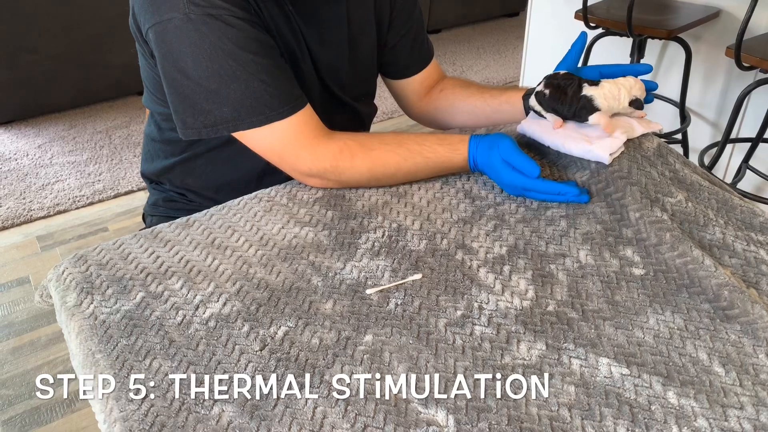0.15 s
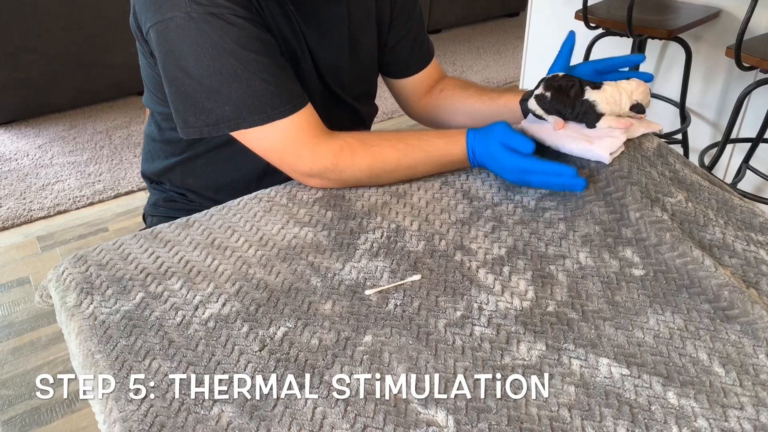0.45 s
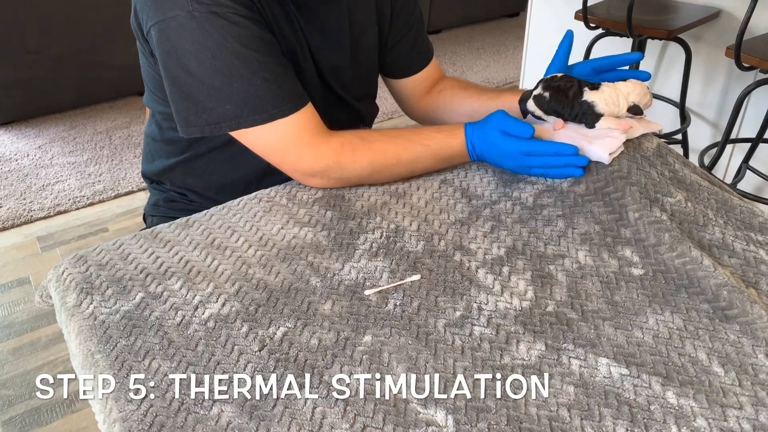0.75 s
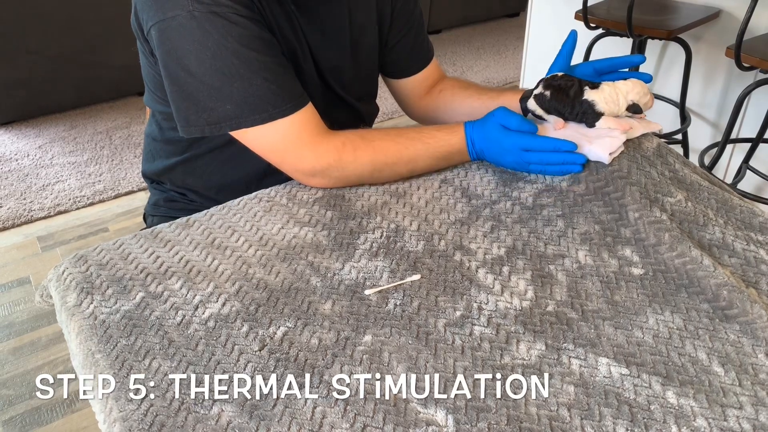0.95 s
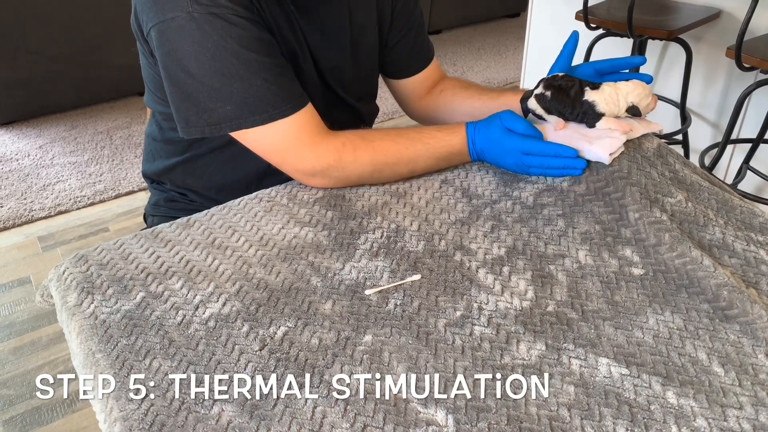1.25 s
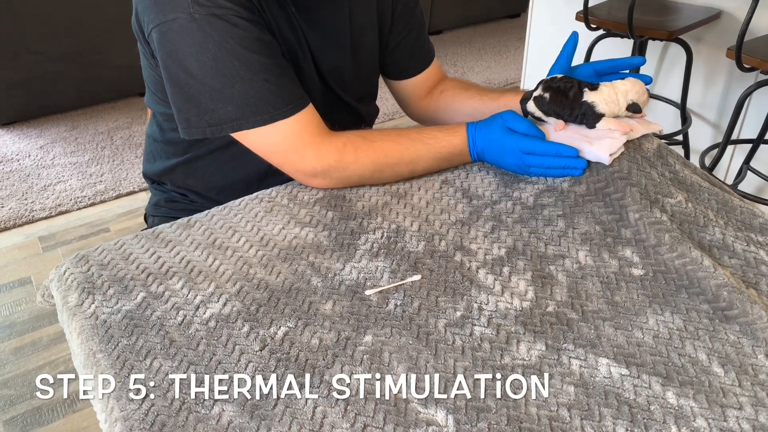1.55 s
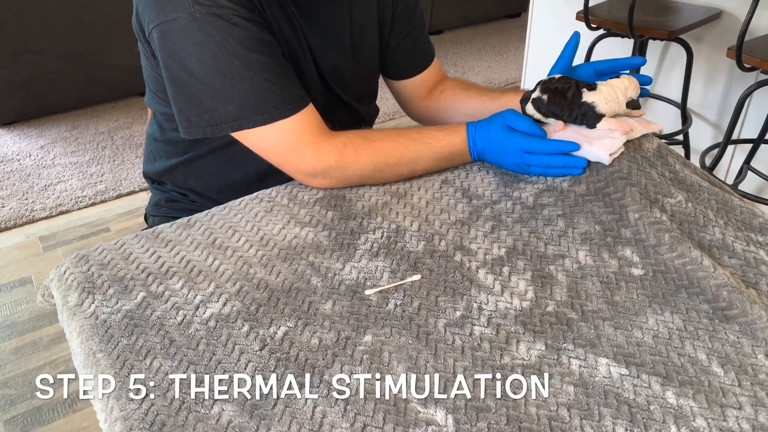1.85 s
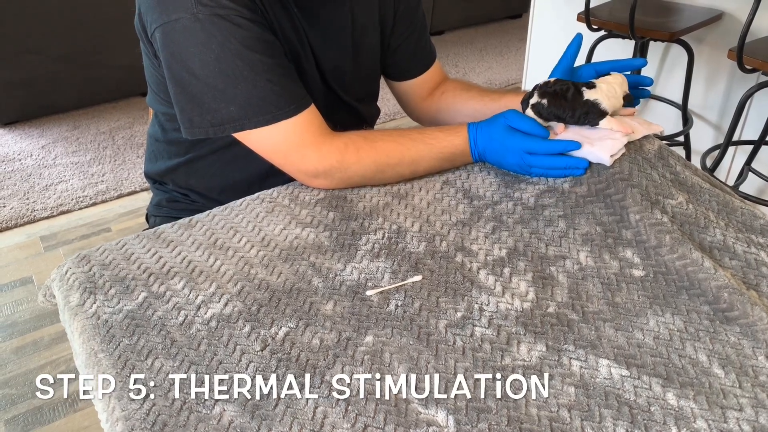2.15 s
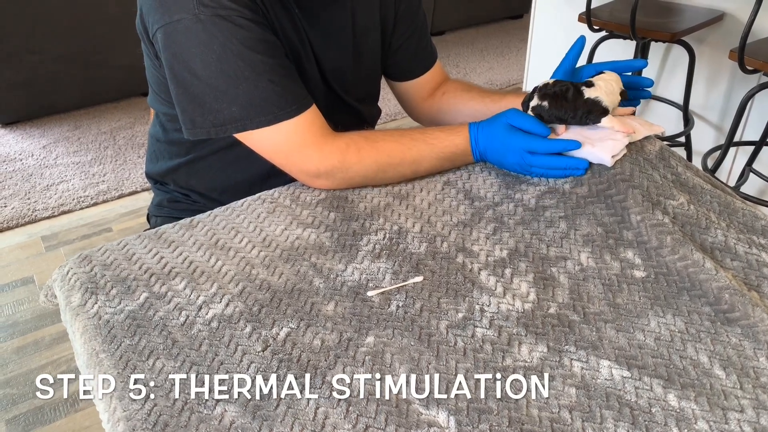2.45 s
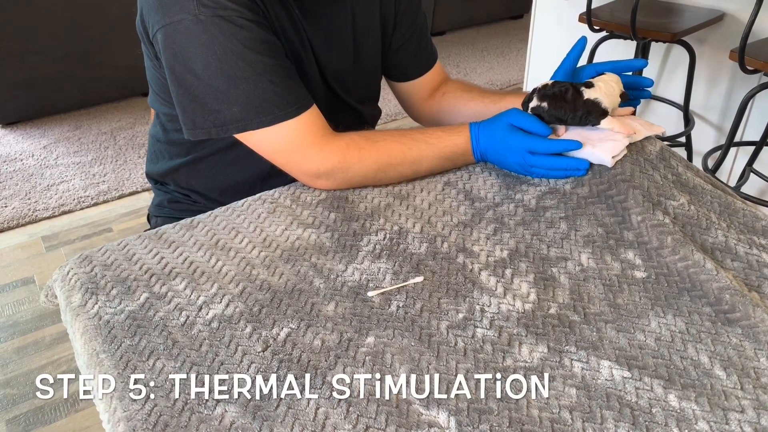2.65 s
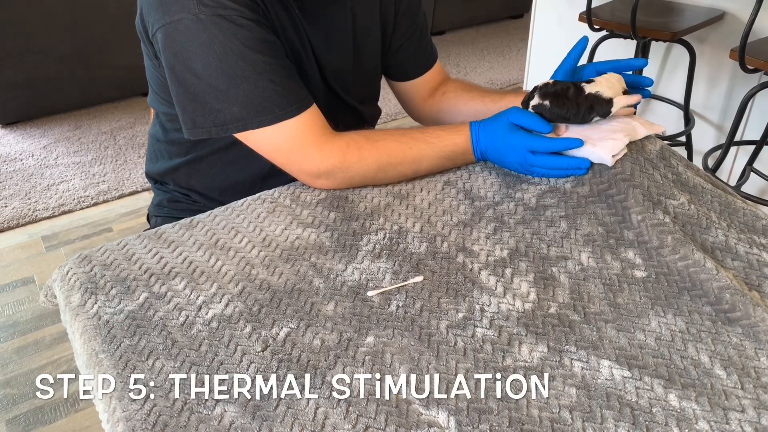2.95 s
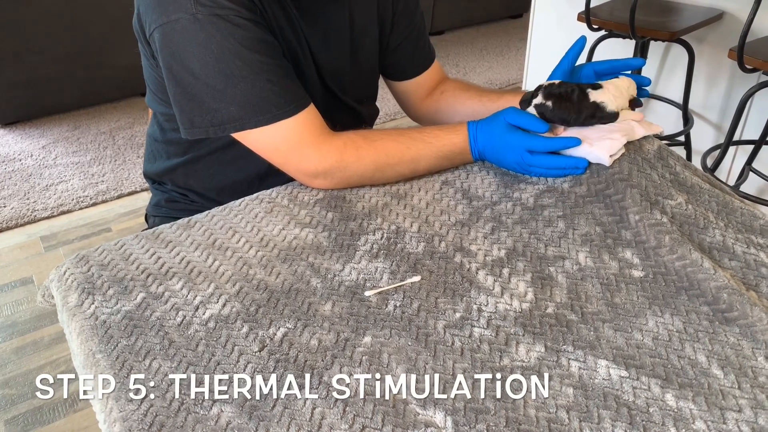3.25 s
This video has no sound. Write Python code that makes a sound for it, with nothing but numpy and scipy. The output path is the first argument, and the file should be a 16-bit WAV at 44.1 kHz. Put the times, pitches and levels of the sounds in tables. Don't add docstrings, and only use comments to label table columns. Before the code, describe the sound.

A newborn puppy squeals eight times in quick, arching cries, some soft, some raspy and piercing, a couple of metres from the microphone in a lively hard-floored room with a low appliance hum.

```python
import sys
import numpy as np
from scipy import signal
from scipy.fft import rfft, irfft
from scipy.io import wavfile
from scipy.ndimage import uniform_filter1d

SR = 44100
rng = np.random.default_rng(int(sys.argv[2]) if len(sys.argv) > 2 else 0)


def dump(signal):
    limited = np.clip(np.atleast_2d(signal).T, -1, 1)
    pcm = np.round(limited * 32767).astype(np.int16)
    wavfile.write(sys.argv[1], SR, pcm)


def makeup_ratio(level_db):
    decades = np.asarray(level_db, float) / 20
    return 10 ** decades


N = 149940
T = np.arange(N) / SR

# t/s, pitch f/Hz, level/dB, mouth opening/dB
SOFT_SQUEALS = [
    [(0.08, 337.3, -68, -22), (0.122, 527, -49.5, -46), (0.168, 537.5, -44, -66), (0.19, 498.7, -49.5, -59),
     (0.214, 406.2, -47.5, -42), (0.242, 356.7, -51.5, -35), (0.27, 345.5, -49, -51)],
    [(0.85, 343, -55, -29.5), (0.88, 346.3, -58.5, -38), (0.918, 461, -48.5, -59), (0.94, 458.7, -45, -56),
     (0.962, 452.6, -48.5, -38), (0.998, 350.4, -48, -30), (1.04, 353, -65, -32)],
    [(1.705, 406, -71, -18), (1.727, 428.4, -54, -43), (1.783, 631, -41.5, -55), (1.797, 642, -43.5, -39),
     (1.833, 554, -44.5, -38), (1.875, 409, -47, -48), (1.9, 410.0, -49, -37)],
    [(2.515, 351, -62, -14), (2.527, 361, -55.5, -27), (2.581, 669, -40, -53), (2.623, 692.2, -41, -22),
     (2.699, 496.2, -46.5, -18), (2.743, 342.8, -52.5, -24), (2.77, 322.5, -51, -20)],
]
PUSHED_SQUEALS = [
    [(0.45, 419.3, -69, -31), (0.462, 509.5, -56, -43), (0.48, 652.4, -48, -51), (0.49, 708.4, -39.5, -45),
     (0.496, 722, -38, -45), (0.516, 749.3, -41, -34), (0.528, 801.4, -40, -37), (0.546, 620, -44.5, -42),
     (0.58, 520, -53, -33)],
    [(1.208, 475.8, -86, -17), (1.22, 531.5, -56, -46), (1.242, 754.8, -43, -52), (1.256, 790.6, -40, -37),
     (1.276, 709.5, -39, -34.5), (1.306, 722, -40, -37), (1.32, 810.7, -43.5, -33),
     (1.345, 689.7, -44.5, -29.5), (1.41, 522, -52.5, -21)],
    [(2.09, 491.5, -59, -33), (2.116, 620.8, -45.5, -57), (2.144, 771.5, -39, -50), (2.15, 799, -36.5, -40),
     (2.166, 912.3, -34, -27), (2.19, 798, -32, -31), (2.204, 767.6, -39, -21.5), (2.236, 639.4, -48, -18),
     (2.27, 563, -52.5, -19)],
    [(2.952, 468.5, -51, -35), (2.968, 550, -50, -69), (2.988, 736, -39.5, -31.5),
     (3.02, 821.3, -36, -10.5), (3.042, 804, -33.5, -20), (3.098, 629, -43, -16.5),
     (3.158, 678.2, -41, -21), (3.198, 519, -46, -27), (3.22, 456, -41, -36)],]
# roughness/0-1, tilt/dB per octave, ring level/dB, ring
# growth/dB per s, top air level/dB
VOICE_QUALITY = [(.08, -6.5, -11, 14, -55), (.08, -6, -19, 21, -55), (0.11, -3, -12, 2, -50),
                 (0.08, -2.5, -4.5, 34, -24), (.22, -3, -5.5, 15, -16), (.45, -1, -5, 22, -22.5),
                 (0.44, 0.5, -4.5, 8, -23), (.12, -1, -5.5, 37, -21.5)]
# peak f/Hz, peak level/dB, dip f/Hz, dip level/dB, cheek level/dB
MOUTH_POSTURE = [(1640, -0.5, 3200, -6.5, 0), (2400, 6, 1700, -4.5, -5), (1950, 2, 1370, -3, 7),
                 (1298, 3, 2340, -7.5, 1), (1620, -3, 3200, -3.5, -0.5), (1360, 1, 2110, -2.5, 8),
                 (1103, 2, 2300, -2.5, 9), (1910, 3, 1200, -2.5, -1)]
# start t/s, length t/s, share/0-1, fundamental level/dB, its fading/dB per s
REGISTER_BREAK = [(.2, 0.062, 0, -0.5, -2.5), (0.964, 0.057, 0.06, -0.5, 0), (1.834, 0.091, 0.01, -1, 15),
                  (2.523, 0.045, .1, 1, -11), (0.487, 0.039, 0.97, 6.5, -15),
                  (1.249, 0.067, 0.62, 5.5, -19), (2.136, 0.03, .9, 5.5, -34), (2.999, 0.038, 0.1, 4, -65)]
GUM_HISS = [7500, 7700, 7800, 7040, 5400, 7630, 7100, 6830]
# start t/s, length t/s, f/Hz, level/dB
SIDE_TONES = [(2.995, 0.036, 1150, -32), (2.965, 0.026, 1150, -41), (1.25, 0.092, 950, -44.5),
              (.487, 0.027, 1050, -41.5), (.52, 0.021, 1600, -40.5), (3.035, 0.047, 1400, -34),
              (2.672, 0.034, 1540, -41), (2.135, 0.034, 1150, -34), (.485, 0.046, 2180, -43),
              (.51, 0.032, 910, -43), (1.25, 0.031, 1300, -38), (1.272, .03, 1480, -36),
              (1.29, 0.028, 1300, -34), (1.31, 0.025, 1400, -41.5), (1.245, .035, 2400, -46),
              (.145, 0.042, 1620, -48), (2.995, 0.077, 2250, -41), (3.1, .08, 2650, -43.5),
              (.495, 0.023, 3150, -54.5)]
# f/Hz, level/dB
THROAT = [(120, -78), (300, -8), (600, -6), (1100, 3.5), (1600, 3), (2200, -2), (3000, -21), (4300, -56)]
# f/Hz, level/dB
FRONT_RING = [(1700, -37), (2000, 1.5), (2700, 5), (3300, 3), (3650, -10), (4200, -15), (5200, -25),
              (5800, -49)]
# f/Hz, level/dB
OPEN_MOUTH = [(2700, -29), (3500, 0.5), (4400, -2), (5200, -2), (6000, 1), (7000, -6), (8000, -8.5),
              (8500, -45)]
# f/Hz, level/dB
TOP_AIR = [(9600, -44), (10200, 2), (11500, 9.5), (13300, 7), (15000, 12), (16000, -2.5)]
# f/Hz, level/dB per Hz
AIR_NOISE = [(15, -57), (25, -26), (170, -17), (307, -7), (526, -13), (1280, -24), (2380, -34),
             (12000, -45.5), (15700, -55)]
# f/Hz, width/Hz, level/dB
APPLIANCE_HUM = [(260.5, 34.6, -71), (320.4, 43, -64.5), (410, 76, -76.5), (119.3, 6.8, -92.5)]
# f/Hz, T60/s
REVERB_TIME = [(400, 0.5), (1500, 0.43), (4000, 0.39), (8000, 0.37), (14000, 0.29)]
# f/Hz, level/dB
MICROPHONE = [(20, -21), (45, -1.5), (70, 0)]

AIR_DB, DIRECT_DB, ROOM_DB = -66.5, -1.5, -3.5
ROOM_BUILD_S = 0.0028
WRIGGLE_S, ECHO_WANDER_S = 0.0004, 0.0002
JITTER, SHIMMER_DB = 0.1245, 6.5
ONSET_ROUGH, ONSET_S = 0.348, 0.0303
PATCHY_DB = 2.5
ATTACK_S, RELEASE_S = 0.018, 0.017
BREAK_RATIO = 3 / 2
BREATH_DB, BREATH_DB_PER_ROUGH, RING_BREATH_DB = -14, 19, -13
RING_LATE_DB, RING_OPENS_S = -12, 0.024
RING_FOLLOWS_MOUTH, TOP_FOLLOWS_MOUTH = 0.3, 0.5
HISS_DB, HISS_OCTAVES = 4.5, 0.064
SHAPE_OCTAVES, CHEEK_HZ = 0.16, 3790
NASAL_HZ, NASAL_DB, NASAL_OCTAVES = 5020, -4, 0.068


def unit(x):
    return x / np.sqrt(np.mean(x ** 2) + 1e-30)


def bin_hz(size):
    return np.maximum(np.arange(size // 2 + 1) * SR / size, 1)


def colour(x, table):
    hz, db = np.array(table, float).T
    gain = makeup_ratio(np.interp(np.log(bin_hz(len(x))), np.log(hz), db))
    return irfft(rfft(x) * gain, len(x))


def walk(rate, size):
    k = max(int(SR / rate), 1)
    once = uniform_filter1d(rng.standard_normal(size), k)
    return unit(uniform_filter1d(once, k))


def background():
    out = makeup_ratio(AIR_DB) * unit(colour(rng.standard_normal(N), AIR_NOISE))
    for hz, width, db in APPLIANCE_HUM:
        sos = signal.butter(2, [hz - width / 2, hz + width / 2], "band", fs=SR, output="sos")
        hum = unit(signal.sosfilt(sos, rng.standard_normal(N)))
        out = out + makeup_ratio(db + 1.5 * walk(6, N)) * hum
    return out


def room(x):
    t = T[:SR]
    hz, t60 = np.array(REVERB_TIME).T
    tail = 0
    for f in 180 * 2 ** np.arange(0, 6.6, 0.5):
        half_octave = [(f / 1.45, -60), (f / 1.15, 0), (f * 1.15, 0), (f * 1.45, -60)]
        band = colour(rng.standard_normal(SR), half_octave)
        tail = tail + band * makeup_ratio(-60 * t / np.interp(np.log(f), np.log(hz), t60))
    tail = tail * (1 - np.exp(-t / ROOM_BUILD_S))
    spectrum = rfft(tail)
    power = np.abs(spectrum) ** 2 + 1e-12
    evening = np.sqrt(uniform_filter1d(power, size=801) / uniform_filter1d(power, size=41))
    tail = irfft(spectrum * evening, SR)
    tail_energy = np.sum(colour(tail, THROAT) ** 2)
    noise_power = np.mean(colour(rng.standard_normal(SR), THROAT) ** 2)
    tail = tail / np.sqrt(tail_energy / noise_power)
    moved = np.interp(T + WRIGGLE_S * walk(24.9, N), T, x)
    echoes = signal.fftconvolve(moved, tail)[:N]
    return np.interp(T + ECHO_WANDER_S * walk(20, N), T, echoes)


def side_tone(start, length, hz, db):
    phase = 2 * np.pi * np.cumsum(hz * (1 + 0.0142 * walk(45.15, N))) / SR
    env = np.sin(np.pi * np.clip((T - start) / length, 0, 1)) ** 2
    return makeup_ratio(db) * env * np.sin(phase)


def mouth_shape(x, peak_hz, peak_db, dip_hz, dip_db, cheek_db):
    octave = np.log2(bin_hz(len(x)))
    bumps = [(peak_hz, peak_db, SHAPE_OCTAVES), (dip_hz, dip_db, SHAPE_OCTAVES),
             (CHEEK_HZ, cheek_db, SHAPE_OCTAVES / 2), (NASAL_HZ, NASAL_DB, NASAL_OCTAVES)]
    gain_db = 0
    for hz, db, wide in bumps:
        gain_db = gain_db + db * np.exp(-0.5 * ((octave - np.log2(hz)) / wide) ** 2)
    return irfft(rfft(x) * makeup_ratio(gain_db), len(x))


def fold_cycles(t, age, glide, phase, start, length, share, first_db, fade_db):
    size = len(t)
    folds = 0
    for k in range(1, 31):
        partial_db = PATCHY_DB * walk(50, size)
        if k == 1:
            partial_db = partial_db + first_db + fade_db * age
        audible = k * glide < 0.45 * SR
        folds = folds + makeup_ratio(partial_db) * np.cos(k * phase + k * k / 8) * audible
    upper = sum(np.cos(k * BREAK_RATIO * phase + k * k / 8) for k in range(1, 15))
    arch = np.sin(np.pi * np.clip((t - start) / length, 0, 1))
    jump = np.clip(share, 0, 1) * np.sqrt(np.abs(arch))
    return unit(folds) * (1 - jump) + unit(upper) * jump


def squeal(rows, hiss_hz, posture, register, rough, tilt_db, ring_db, growth_db, top_db):
    s, hz, db, mouth_db = np.array(rows, float).T
    a = int(s[0] * SR) - 512
    t = T[a:a + 16384]
    size = len(t)
    age = np.clip(t - s[0], 0, s[-1] - s[0])
    unsteady = np.exp(-age / ONSET_S) + np.exp((age - age[-1]) / ONSET_S)
    rasp = rough + ONSET_ROUGH * unsteady

    glide = uniform_filter1d(np.interp(t, s, hz), size=SR // 80)
    wobble = 0.0082 * walk(41.9, size) + JITTER * rasp * walk(259, size)
    phase = 2 * np.pi * np.cumsum(glide * (1 + wobble)) / SR
    folds = fold_cycles(t, age, glide, phase, *register)
    folds = folds * makeup_ratio(SHIMMER_DB * rasp * walk(120, size))
    puff = unit(rng.standard_normal(size) * (1 + 1.1 * np.cos(phase)))
    voice = folds + makeup_ratio(BREATH_DB + BREATH_DB_PER_ROUGH * rasp) * puff

    attack = np.clip((t - s[0]) / ATTACK_S, 0, 1)
    release = np.clip((s[-1] - t) / RELEASE_S, 0, 1)
    env = makeup_ratio(np.interp(t, s, db)) * attack * release
    mouth_db = np.interp(t, s, mouth_db)
    opening_db = RING_LATE_DB * np.exp(-age / RING_OPENS_S)
    ring_gain_db = ring_db + opening_db + growth_db * age + RING_FOLLOWS_MOUTH * mouth_db

    throat = [(f, g + tilt_db * np.log2(f / 1300)) for f, g in THROAT]
    hiss = [(hiss_hz * 2 ** (n * HISS_OCTAVES), -abs(n) * 10) for n in (-4, 0, 4)]
    paths = [(voice, throat, 0),
             (voice + makeup_ratio(RING_BREATH_DB) * puff, FRONT_RING, ring_gain_db),
             (folds + makeup_ratio(-5.5) * puff, OPEN_MOUTH, mouth_db),
             (folds + puff, hiss, mouth_db - HISS_DB),
             (0.5 * folds + puff, TOP_AIR, TOP_FOLLOWS_MOUTH * mouth_db + top_db)]
    cry = 0
    for x, table, gain_db in paths:
        steady_level = np.std(colour(x, table))
        cry = cry + colour(x * env * makeup_ratio(gain_db), table) / steady_level
    out = np.zeros(N)
    out[a:a + size] = mouth_shape(cry, *posture)
    return out


def puppy():
    contours = SOFT_SQUEALS + PUSHED_SQUEALS
    settings = zip(contours, GUM_HISS, MOUTH_POSTURE, REGISTER_BREAK, VOICE_QUALITY)
    cries = sum(squeal(rows, hiss_hz, posture, register, *quality)
                for rows, hiss_hz, posture, register, quality in settings)
    return cries + sum(side_tone(*row) for row in SIDE_TONES)


def scene():
    pup = puppy()
    return (makeup_ratio(DIRECT_DB) * pup + makeup_ratio(ROOM_DB) * room(pup) + background())[None]


def band_limit(x):
    return signal.sosfilt(signal.butter(12, 15890, fs=SR, output="sos"), x)


def record(dry):
    mix = colour(dry[0], MICROPHONE)[None]
    return band_limit(mix)


dry = scene()
out = record(dry)
dump(out)
```